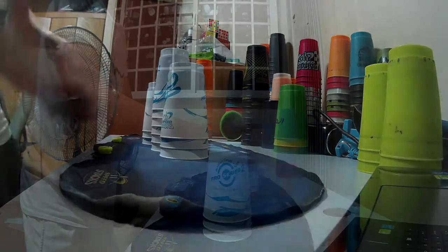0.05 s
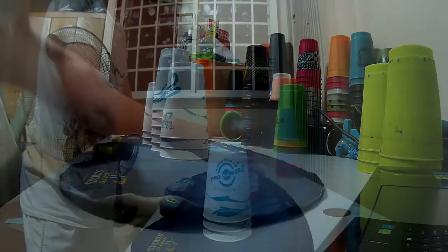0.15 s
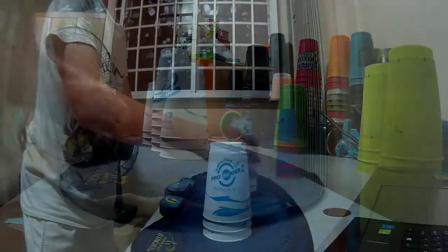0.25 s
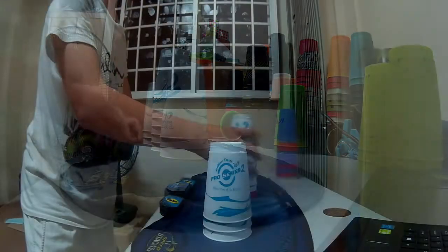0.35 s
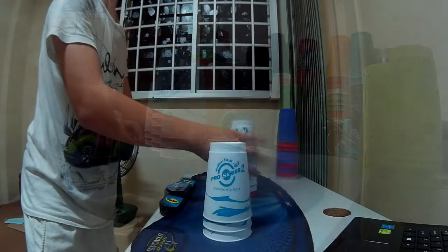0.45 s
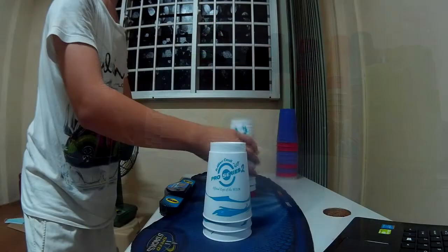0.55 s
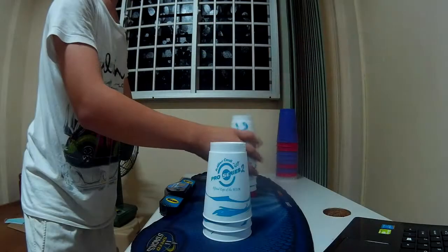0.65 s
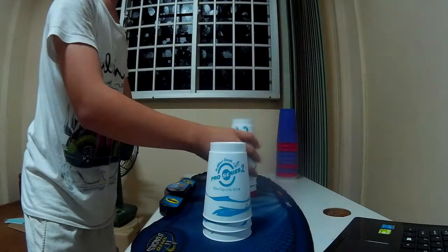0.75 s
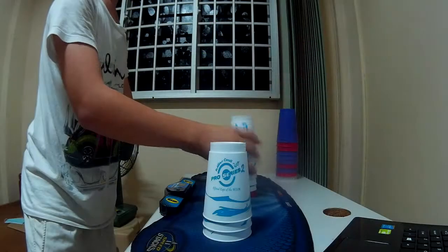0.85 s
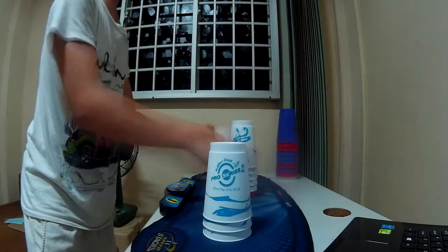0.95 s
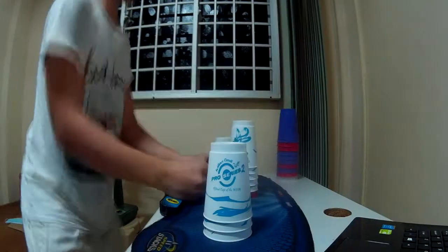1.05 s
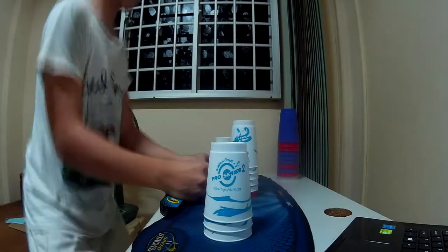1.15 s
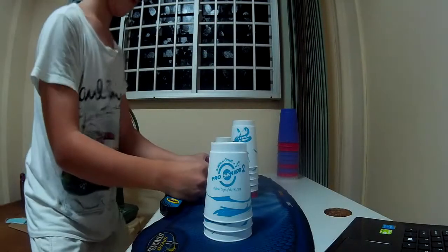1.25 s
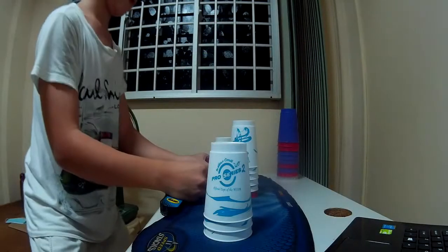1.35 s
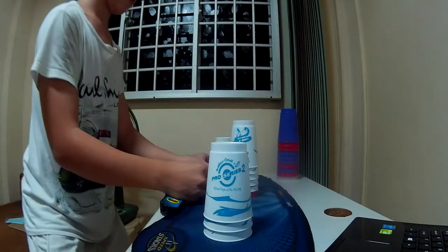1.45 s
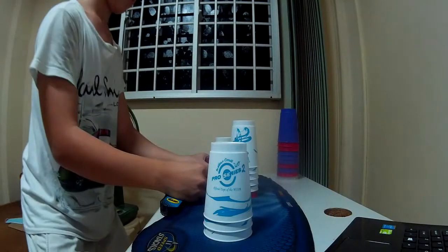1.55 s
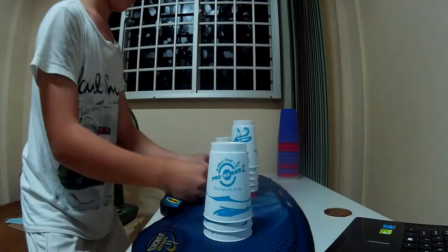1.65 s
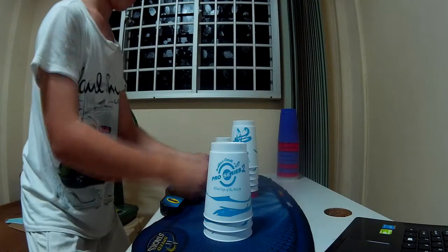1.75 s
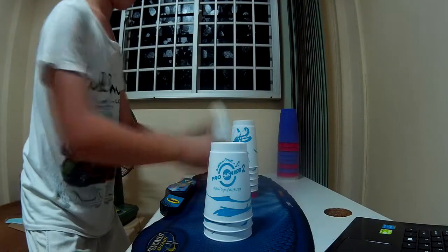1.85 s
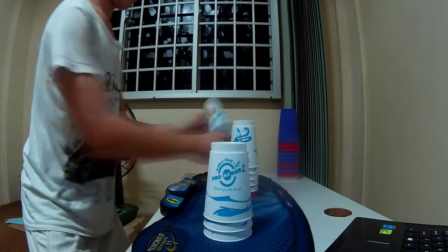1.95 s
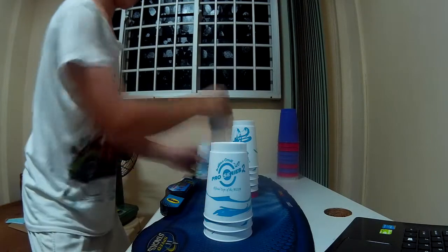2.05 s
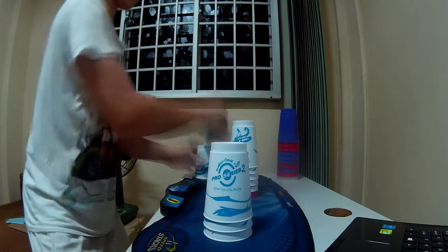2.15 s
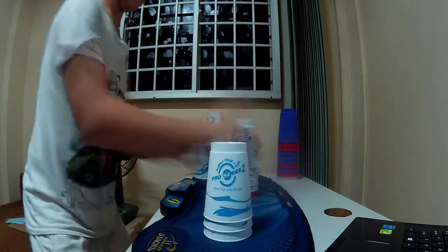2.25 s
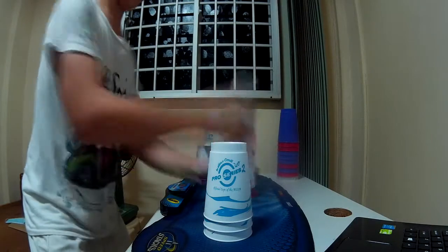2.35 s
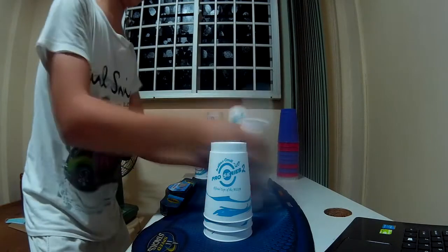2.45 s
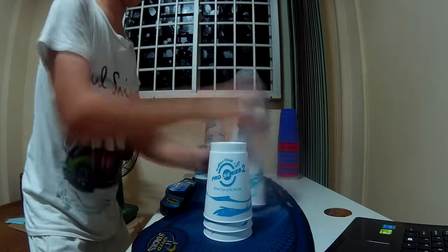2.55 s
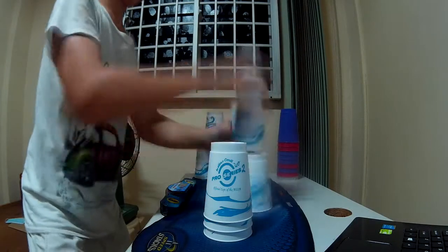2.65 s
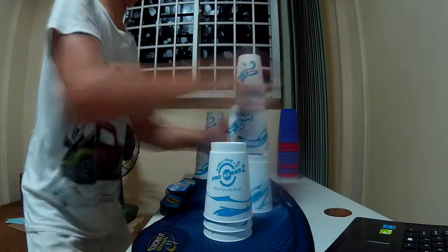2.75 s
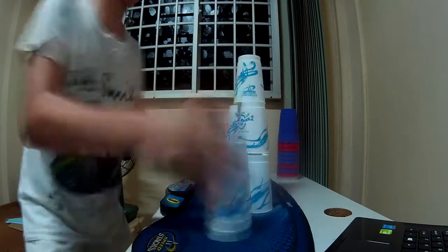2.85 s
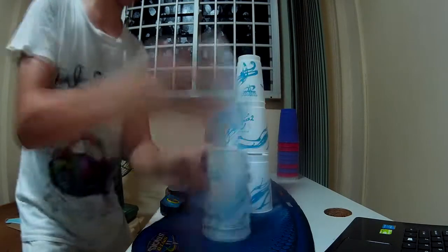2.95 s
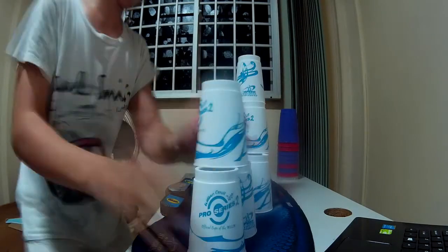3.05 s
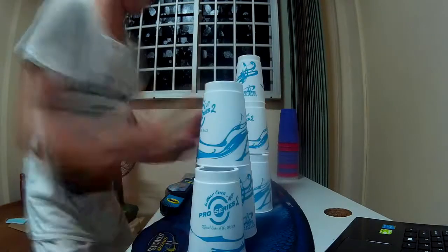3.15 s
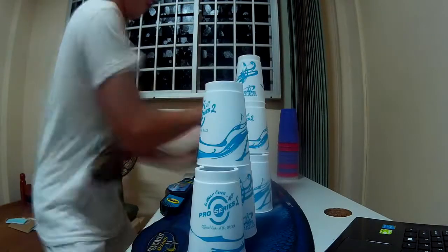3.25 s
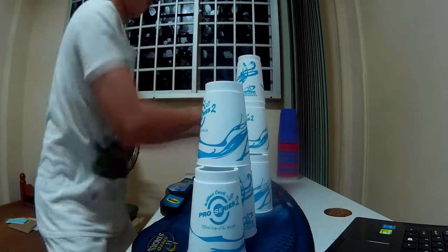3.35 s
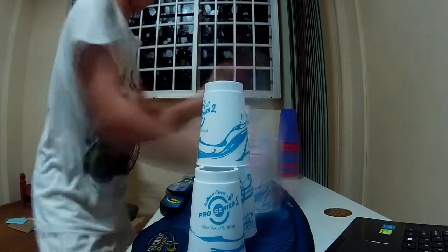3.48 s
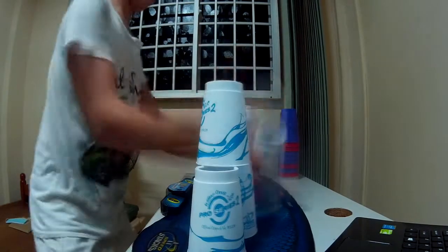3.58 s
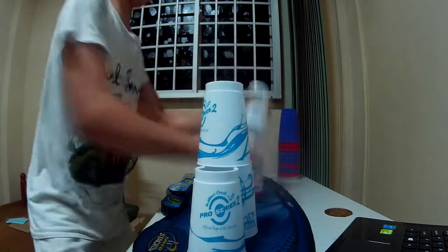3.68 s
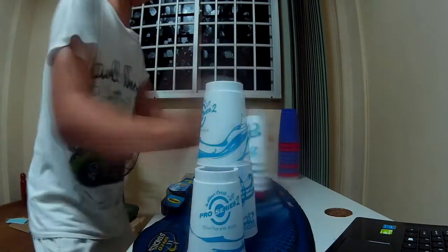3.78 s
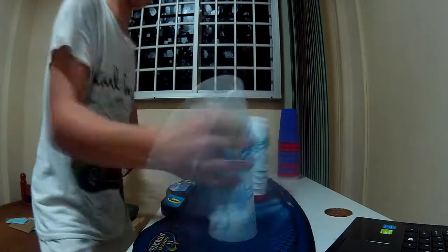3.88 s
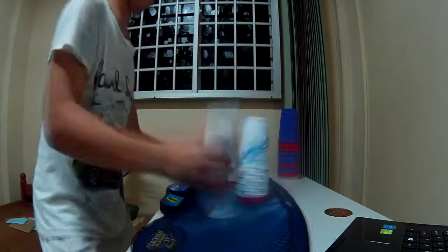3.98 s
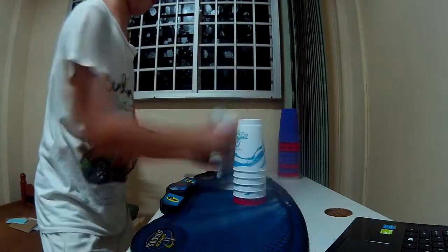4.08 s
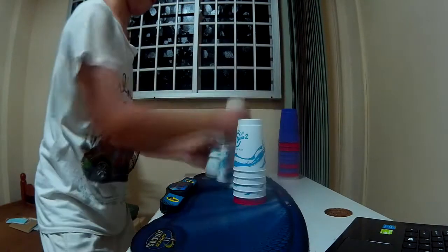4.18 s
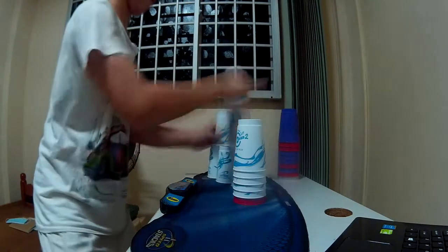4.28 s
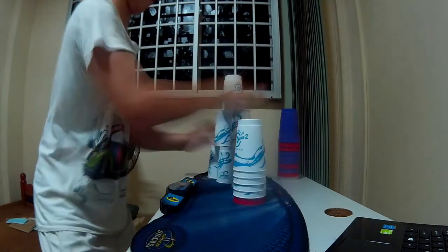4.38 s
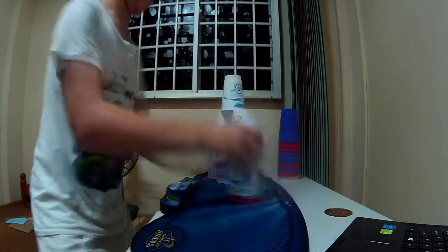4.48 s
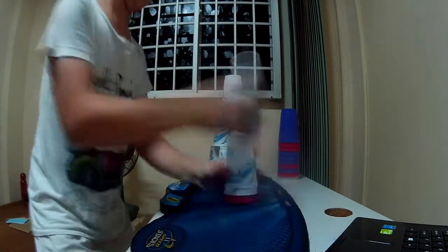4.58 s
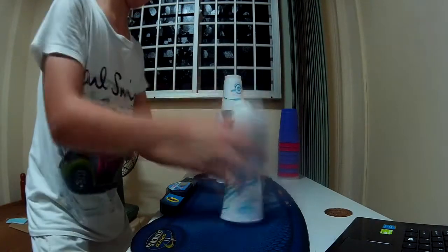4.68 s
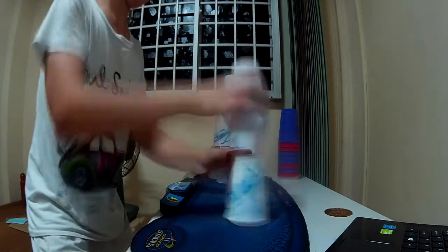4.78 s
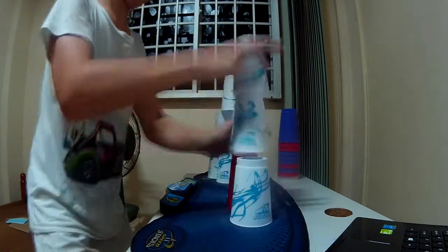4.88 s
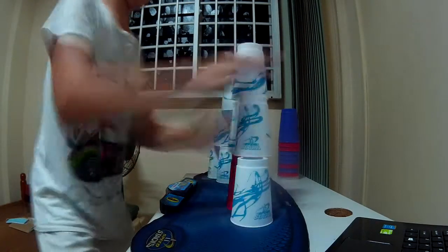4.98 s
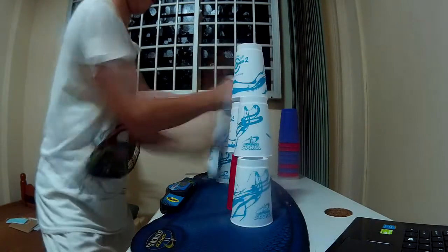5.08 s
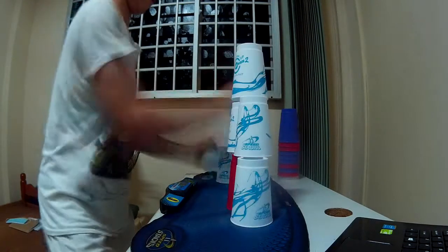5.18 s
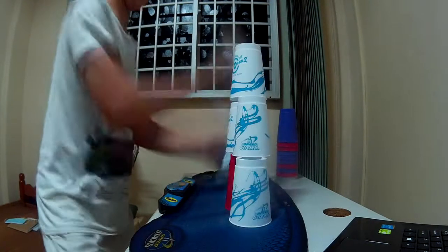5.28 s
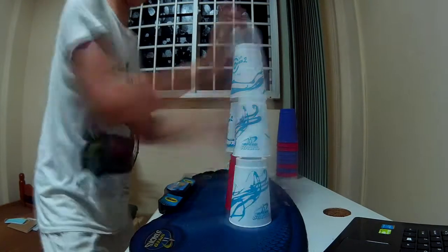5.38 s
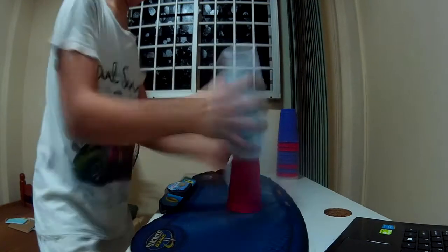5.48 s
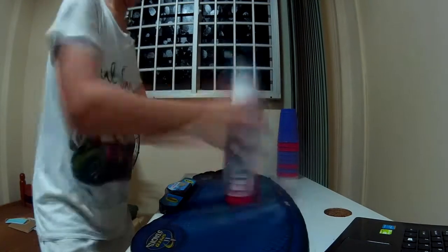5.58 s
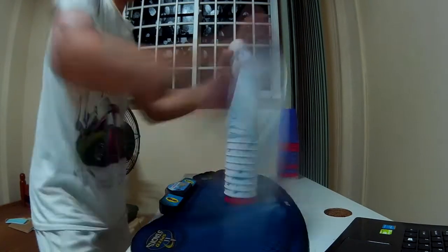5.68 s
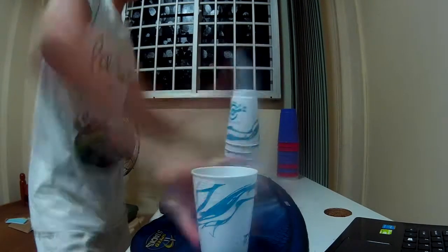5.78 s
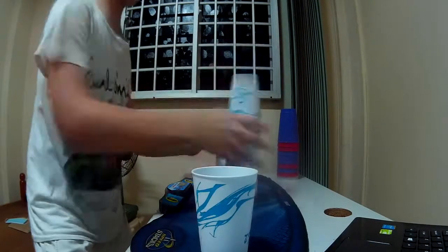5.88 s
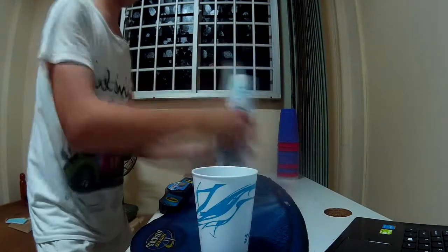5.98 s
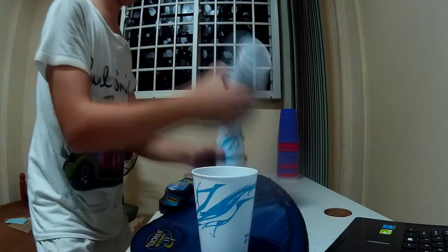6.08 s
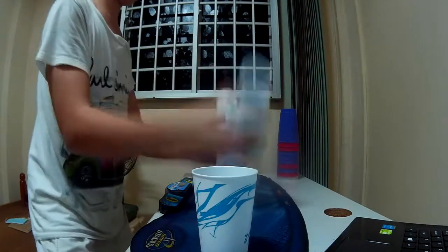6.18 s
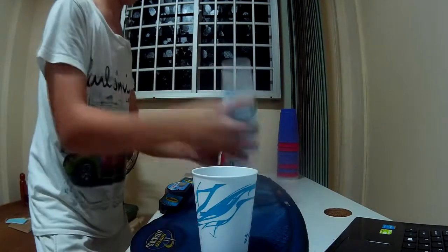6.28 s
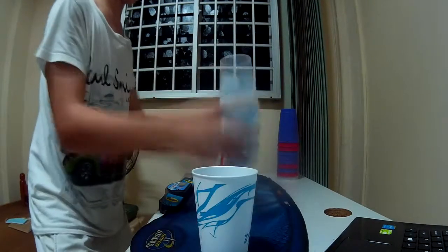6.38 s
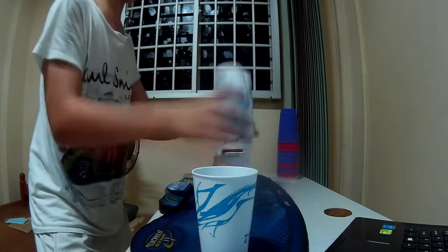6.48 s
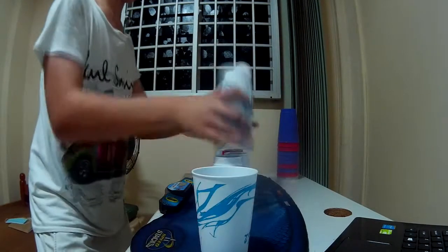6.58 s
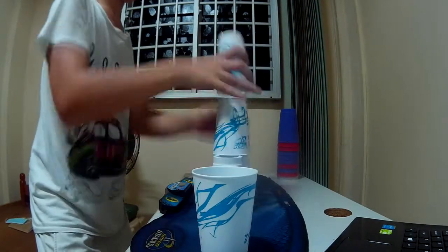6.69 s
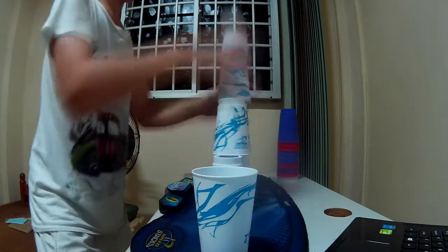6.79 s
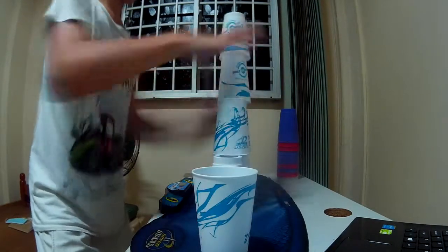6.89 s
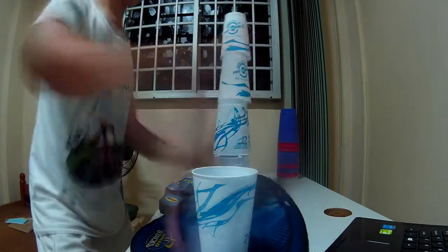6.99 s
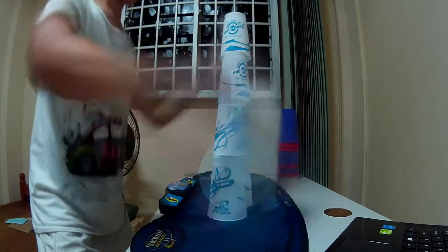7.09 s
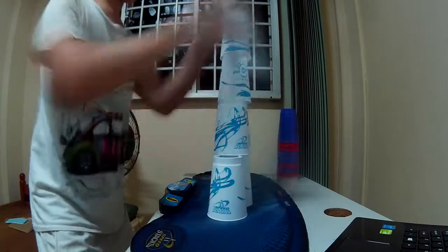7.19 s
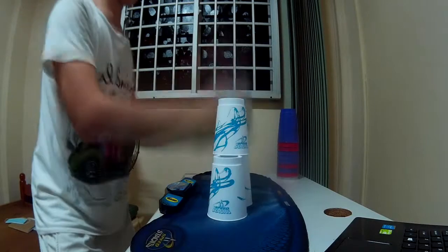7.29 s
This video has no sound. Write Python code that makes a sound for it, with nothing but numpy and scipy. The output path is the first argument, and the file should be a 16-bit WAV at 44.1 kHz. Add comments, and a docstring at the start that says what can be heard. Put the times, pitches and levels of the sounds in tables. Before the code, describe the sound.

Rapid hollow knocks and sharp rim clicks of plastic cups being stacked and unstacked, growing loud and crackly, with brief lulls.

```python
"""Stacking hard plastic cups

Hard plastic cups are nested, slid apart and slapped into pyramids on a thin mat on a desk, heard close up.
Each knock is a short burst of noise that rings the hollow of the cups and their stiff walls.
Between knocks, random taps and rubbing ring the same modes as cups scrape and rattle; one cup hoots on.
A small room answers with echoes over a faint hiss; the microphone cuts the bass and overloads when hit hard."""
import sys
import numpy as np
from scipy import signal
from scipy.fft import rfft, irfft
from scipy.io import wavfile
from scipy.ndimage import uniform_filter1d

SR = 44100
rng = np.random.default_rng(int(sys.argv[2]) if len(sys.argv) > 2 else 0)


def to_wav(sig):
    """Store sig (one row per channel, or 1-D mono) as 16-bit WAV at the path in sys.argv[1].

    Samples outside -1..1 are clipped; the rate is SR.
    """
    pcm = np.clip(np.atleast_2d(sig), -1, 1) * 32767
    pcm = np.round(pcm).astype(np.int16)
    wavfile.write(sys.argv[1], SR, pcm.T)  # frames by channels


N = 323324

# Ways the air and floor of a cup ring: f/Hz, level/dB, time to die by 60 dB/s
HOLLOW = [(343.9, -15, 0.071), (517, -0.5, 0.011), (726, 4, 0.015), (880, 2, 0.0081), (1126.6, -6.5, 0.028),
          (1272, 2, 0.015), (1592, -1, 0.0097)]
# Ways the wall and rim of a cup ring: f/Hz, level/dB, time to die by 60 dB/s
WALL = [(1858.4, -6.5, 0.0061), (2332, -6, 0.0049), (3044, -6, 0.0063), (3467, -1.5, 0.0067),
        (3907, -0.5, 0.0064), (4494, -1.5, 0.0038), (5370, 2.5, 0.0054), (6080, -3, 0.003134),
        (6930, -10, 0.003), (7970, -5.5, 0.0041), (9180, -2.5, 0.0023), (12230, -10.5, 0.00075)]
# Slides of cups scraping and rattling on each other: start t/s, time held/s, hollow level/dB,
# wall level/dB, time to die by 60 dB/s (the signs of both durations are ignored)
SLIDES = [(0.135, 0.11406, -48.5, -40.5, 0.7), (0.309, 0.053, -26.5, -34, 0.32),
          (0.555, 0.11, -38, -31.5, 1.65), (0.776, 0.095, -33, -26, 0.49), (1.125, 0.079, -31.5, -31, 0.17),
          (1.846, 0.23, -47.5, -45.5, 27), (1.914, 0, -21, -30, 1.46), (2.086, 0.12, -33.5, -27, 1),
          (2.258, 0, -28, -24.5, 1.7), (2.499, 0, -16.5, -14.5, 0.35), (2.52, 0.14, -27, -26, 1.15),
          (2.803, 0.02252, -19, -25, 1.0), (3.092, 0.61, -31, -22.5, -0.2), (3.274, 0.022, -15, -12.5, 1.1),
          (3.36, 0.19, -20.5, -19.5, 0.7), (3.602, 0, -23, -16, 1.34), (3.987, 0.00011, -26, -27, 0.5),
          (4.103, 0.052, -24, -28, 1.2), (4.484, 0.047, -24.5, -24, 0.3974), (4.633, 0.16, -27, -26, 1),
          (4.715, 0.058, -24.5, -22.5, 0.3), (4.902, 0.21, -26.5, -18.5, 2),
          (4.981, 0.22, -20.5, -17.5, 0.9), (5.167, 0.059, -9.5, -7, 0.94), (5.35, 0, -20, -33.5, 1.5),
          (5.56, 0.17118, -25.5, -42.5, 0.5), (5.81, 0.16, -34.5, -36, -0.1), (6.025, 0.01, -40, -43.5, 1),
          (6.141, 0.038, -40.5, -36, 0.33), (6.331, 0.46, -38, -50.5, 0.47), (6.443, 0.056, -32, -24, 0.32),
          (6.627, 0.009, -25, -25, 0.3114), (6.995, 0.1459, -26.5, -25, -0.8),
          (7.063, 0.12, -14.5, -15, 0.23), (7.306, 0.055, -44, -27.5, 0.45)]


def knocks():
    """Each contact is a snap that chatters for a moment, longer when hard, and rings hollow and wall."""
    # Cups landing: t/s, peak wall level/dB, peak hollow level/dB, favoured f/Hz
    landings = [(0.5637, -31, -19.5, 745), (0.682, -11, -20.5, 640), (0.755, -20, -28, 3950),
                (1.0177, -17.5, -37, 1260), (1.916, -7.5, -2, 910), (1.923, -4.5, -9.5, 639.2),
                (2.432, -8, -7, 3964), (2.452, -10.5, -10, 5340), (2.5006, -0.5, -10, 5031),
                (2.7813, 2.5, 3.5, 1810), (3.1732, -7.5, -12.5, 4560), (3.3195, 2.5, -3.5, 800),
                (3.4595, 4, -1, 791.2), (3.5511, -5, -4, 1235), (3.9942, -11, -13.5, 5140),
                (4.1382, -4.5, -7, 4800), (4.481, -36, -8.5, 900), (4.5548, -25, -7.5, 790),
                (4.6334, -7, -5.5, 875), (4.6864, -9, -6.5, 704), (4.72, -6.5, -8, 636.4),
                (5.015, 3.5, 0, 822.4), (5.0956, 0, -2.5, 4170), (5.2173, 6.5, 3.5, 750),
                (5.2836, 3.5, -3.5, 572.1), (5.3817, 0.5, -12.5, 3320), (5.4319, 1.5, -15.5, 1825),
                (5.5475, -10.5, 8, 985), (5.6024, -24, 9, 1080), (5.872, -11, -15, 5500),
                (5.9575, -14, -25, 5520), (6.3117, -12.5, -13.5, 1570), (6.4818, -12, -12, 1220),
                (6.545, -14, -18, 5390), (6.6416, -10, -6, 1260), (6.7948, -17.5, -21, 3560),
                (7.0181, -6.5, -16, 5300), (7.1004, 4.5, 1.5, 885), (7.1472, -8, -1, 620)]
    # Rim clicking on rim: t/s, peak wall level/dB, favoured f/Hz
    rim_clicks = [(0.0119, -11.5, 3830), (0.1098, -13, 1850), (0.1646, -25, 5770), (0.1996, -16, 3720),
                  (0.3156, -13, 5470), (0.586, -13, 5447), (0.7746, -4, 3420), (0.9603, -20, 1140),
                  (1.259, -17.5, 1715), (1.5702, -35, 3030), (1.8557, -25.5, 1253), (2.297, -4.5, 3687),
                  (2.3768, -13.5, 5460), (2.4886, -12, 5300), (2.7392, -7, 4050), (2.8203, 6.5, 4300),
                  (3.2134, -6.5, 3600), (3.2438, -10, 3630), (3.2699, 2.5, 3770), (3.2918, 6.5, 3213),
                  (3.3992, 1.5, 3470), (3.6032, 5, 3420), (3.6297, 6.5, 3180), (3.7137, -11, 3370),
                  (4.1716, -14, 5300), (4.3762, -16.5, 3970), (4.4865, -4, 4620), (4.937, -1.5, 4260),
                  (4.9808, 1, 3750), (5.1906, 10, 3200), (5.444, -3.5, 3320), (5.494, -5.5, 3342),
                  (5.742, -11.5, 3471), (5.784, -12, 1349), (6.1257, -17, 2930), (6.1744, -10.5, 5600),
                  (6.2556, -15.5, 3460), (6.3935, -13, 5300), (6.4191, -25, 3800), (6.623, -13.5, 5380),
                  (7.0638, 8, 3950)]
    click_hollow_db = -20.5  # a click barely stirs the hollow: its level against the wall
    rows = landings + [(s, db, db + click_hollow_db, hz) for s, db, hz in rim_clicks]
    start_s, wall_db, hollow_db, favour_hz = np.transpose(rows)[:, :, None]

    t = np.arange(1024) / SR
    chatter_s = 0.0028 + 0.0018 * gain_of(wall_db)
    strength = np.exp(-t / chatter_s) + 0.8 * (t < 0.0003)  # the snap is the extra start
    chatter = rng.standard_normal((len(rows), 1024)) * strength

    out = np.zeros(N + 4096)
    for modes, peak_db, contact_hz in ((HOLLOW, hollow_db, 3600), (WALL, wall_db, 12000)):
        cups = rings(modes, count=len(rows), detune=0.04, spread_db=3.0,
                     favour_hz=favour_hz[:, None], favour_db=9.5)
        sounds = signal.fftconvolve(cups, chatter, axes=1)
        # A broad contact dulls the blow
        sounds = signal.lfilter(*signal.butter(2, contact_hz, fs=SR), sounds)
        sounds *= gain_of(peak_db) / abs(sounds).max(1, keepdims=True)
        places = np.round(start_s * SR).astype(int) + np.arange(sounds.shape[1])
        np.add.at(out, places, sounds)
    return out[:N]


def rings(modes, count, detune, spread_db, favour_hz, favour_db):
    """Many cups' rings: grip, nesting and the point struck shift each mode and its strength."""
    hz, db, t60 = np.transpose(modes)[:, :, None]
    t = np.arange(2048) / SR
    draws = rng.standard_normal((count, len(modes), 1, 2))
    shift, strength = draws.transpose(3, 0, 1, 2)
    # Modes near the favoured pitch ring louder and longer
    favoured = np.exp(-(np.log(hz / favour_hz) / 0.17) ** 2)
    db = db + spread_db * strength + favour_db * favoured
    t60 = t60 * (1 + favoured)
    waves = np.sin(2 * np.pi * hz * (1 + detune * shift) * t)
    return (gain_of(db - 60 * t / t60) * waves).sum(1)


def handling():
    """Scraping drives the hollow and the wall, each by its own amount, with slips shared by both."""
    hollow_db, wall_db = np.transpose(SLIDES)[2:4]
    slip_starts = rng.random(N) * (rng.random(N) < 60 / SR)  # about 60 a second
    slips = signal.lfilter([1], [1, -0.996], slip_starts)  # sudden, then dying
    hollow = rattle(HOLLOW, slips, hollow_db, per_s=760, uneven_db=2.5, rub=0.97, contact_hz=1590)
    wall = rattle(WALL, slips, wall_db, per_s=1500, uneven_db=3.0, rub=1.82, contact_hz=14500,
                  thin=0.33)
    return hollow + wall


def rattle(modes, slips, peak_db, per_s, uneven_db, rub, contact_hz, thin=0):
    """Taps over a rub that grips and slips; as the contact wanders, each mode comes and goes.

    thin: tilt in dB per octave for each dB that a stroke is lighter than firm."""
    treble_haste = 0.58  # higher modes die sooner once a slide lets go: power of the pitch ratio
    wander_db = 3.6  # how far each mode comes and goes
    firm_db = -22  # lighter strokes sound thinner, harder ones fuller

    tap_gain = gain_of(uneven_db * np.minimum(rng.exponential(1, N), 4))
    taps = tap_gain * (rng.random(N) < per_s / SR)
    drive = evened(taps) + rub * abs(rng.standard_normal(N))
    drive = evened(drive * (1.1 + slips))

    out = np.zeros(N)
    ring_power = 0
    for hz, db, t60 in modes:
        # Each new grip retunes the mode
        shift = np.repeat(rng.standard_normal(N // 2048 + 1), 2048)[:N]
        turn = np.exp(2j * np.pi * np.cumsum(hz * (1 + 0.042 * shift)) / SR)
        wander = evened(uniform_filter1d(rng.standard_normal(N // 256 + 1), size=9))
        mode_gain = np.repeat(gain_of(db + wander_db * wander), 256)[:N]
        push = drive * rng.choice([-1, 1], N) * mode_gain

        octaves = np.log2(hz / modes[3][0])  # above the fourth mode
        level_db = effort_db(peak_db, 2 ** (treble_haste * octaves))
        tilt_db = thin * np.clip(firm_db - level_db, -12, 12) * octaves
        push = push * np.repeat(gain_of(level_db + tilt_db), 64)[:N]

        # Shift the push down to 0 Hz, let it ring there, and shift it back up
        pole = 10 ** (-3 / (t60 * SR))
        # Two equal poles make steep skirts
        ringing = signal.lfilter([2 * (1 - pole)], [1, -2 * pole, pole ** 2], push / turn)
        out += (turn * ringing).imag
        ring_power += gain_of(db + wander_db ** 2 / 6.24) ** 2 * t60 * SR / (6 * np.log(10))
    # Divide by the strength of all the rings together
    return signal.lfilter(*signal.butter(4, contact_hz, fs=SR), out / np.sqrt(ring_power))


def effort_db(peak_db, haste):
    """Each slide swells, holds and dies away; overlapping slides add in power."""
    grip_s = 0.0054  # a slide swells to full strength
    start, held, t60 = np.transpose(SLIDES)[[0, 1, 4], :, None]
    since = np.arange(0, N + 64, 64) / SR - start  # one value every 64 samples
    dying_db = 60 * haste * np.maximum(since - abs(held), 0) / abs(t60)
    swell = np.clip(since / grip_s, 0, 1)
    power = (swell ** 2 * 10 ** ((peak_db[:, None] - dying_db) / 10)).sum(0)
    return 10 * np.log10(power + 1e-12)


def hoot():
    """The air in a free cup rings on: a wavering tone that sinks and fades until a hand damps it."""
    # The hoot: start t/s, end t/s, starting f/Hz, starting level/dB
    start, end, hz, db = (7.09, 7.305, 548, -20)
    sag_hz_per_s, fade_db_per_s = 190, 40
    t = np.arange(N) / SR - start
    waver = gain_of(2 * evened(uniform_filter1d(rng.standard_normal(N), size=900)))
    tone = np.sin(2 * np.pi * (hz - sag_hz_per_s * t / 2) * t)
    sounding = (t > 0) & (t < end - start)
    return gain_of(db - fade_db_per_s * abs(t)) * sounding * waver * tone


def room(x):
    """Sparse echoes of random sign, each band dying at its own speed."""
    # How long the room rings: f/Hz, time to die by 60 dB/s
    room_t60 = [(300, 0.62), (1500, 0.28), (5000, 0.26), (15000, 0.05)]
    echoes = np.zeros(SR)
    at = np.arange(200, SR - 20, 20)  # one echo at random in each 20 samples
    echoes[at + rng.integers(0, 20, len(at))] = rng.choice([-1., 1.], len(at))
    hz, t, bands = signal.stft(echoes, SR, nperseg=256)
    dying = gain_of(-60 * t / read(room_t60, hz)[:, None])
    tail = signal.istft(bands * dying, SR, nperseg=256)[1]
    return signal.fftconvolve(x, tail / np.linalg.norm(tail))[:N]


def room_tone():
    """Faint steady noise of the room and the preamp: random noise coloured by pitch."""
    # Colour of the noise: f/Hz, relative level/dB
    noise_colour = [(200, -22.5), (445, 9), (800, 12.5), (1570, -4.5), (3690, 10.5), (14000, -24.5)]
    level_db = -64  # average level before the microphone
    colour = gain_of(read(noise_colour, np.fft.rfftfreq(N, 1 / SR)))
    noise = irfft(rfft(rng.standard_normal(N)) * colour, N)
    return gain_of(level_db) * evened(noise)


def gain_of(db):
    """Turn decibels into a factor on the wave."""
    return 10 ** (np.asarray(db) / 20)


def evened(x):
    """Scale a signal to an average (RMS) strength of 1."""
    return x / np.sqrt(np.mean(x ** 2) + 1e-20)


def read(points, hz):
    """Read a curve between its points, along a logarithmic pitch scale."""
    f, value = np.transpose(points)
    return np.interp(np.log(hz + 1), np.log(f + 1), value)


def scene():
    """Cups heard directly, their echo from the room, and the steady noise."""
    wet_db = -18  # level of the room's answer
    cups = knocks() + handling() + hoot()
    return (cups + gain_of(wet_db) * room(cups) + room_tone())[None]


def record(dry):
    """The microphone: bass cut, a slightly lopsided preamp, overload near full scale, treble limit."""
    bass_cut_hz, treble_limit_hz = 353, 16200
    high_pass = signal.butter(6, bass_cut_hz, "high", fs=SR, output="sos")
    cut = signal.sosfilt(high_pass, dry)
    clipped = np.clip(cut + 0.008 * cut * cut, -0.94, 0.95)
    low_pass = signal.firwin(255, treble_limit_hz, window=("kaiser", 7), fs=SR)
    return signal.oaconvolve(clipped, low_pass[None], "same")


dry = scene()
out = record(dry)
to_wav(out)
```